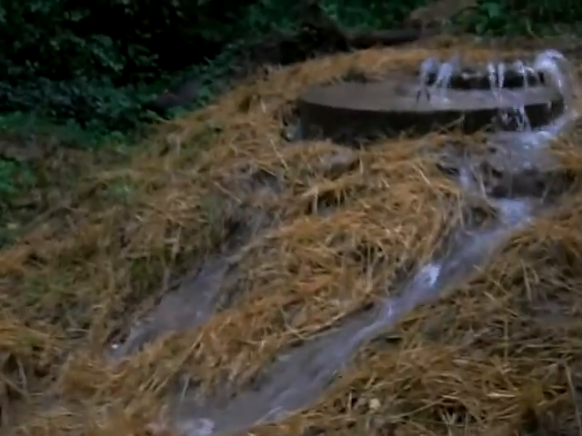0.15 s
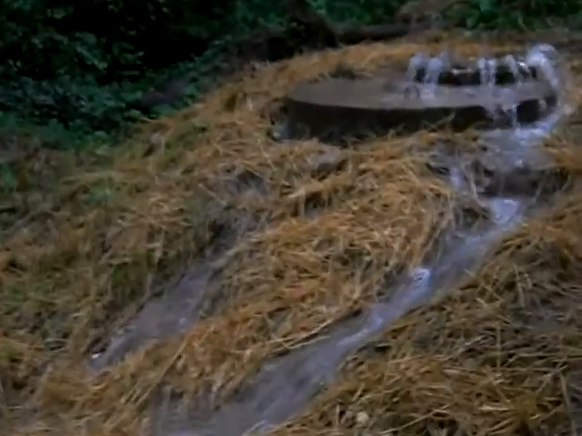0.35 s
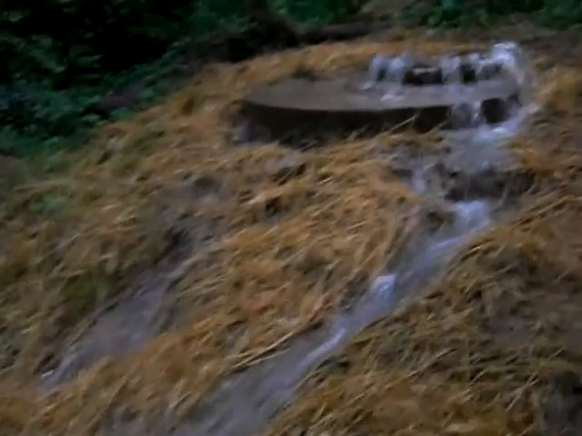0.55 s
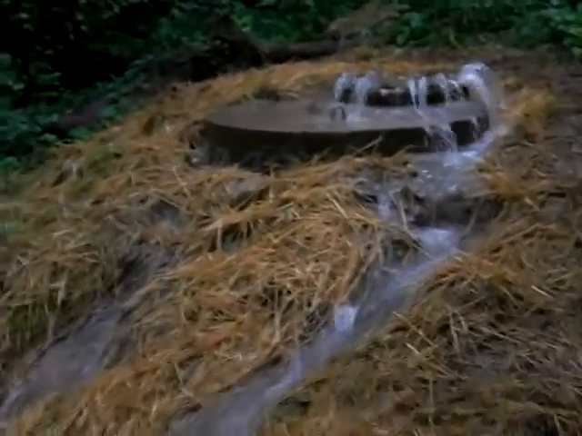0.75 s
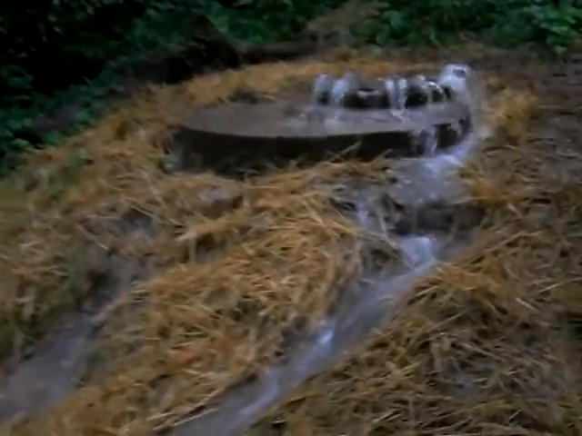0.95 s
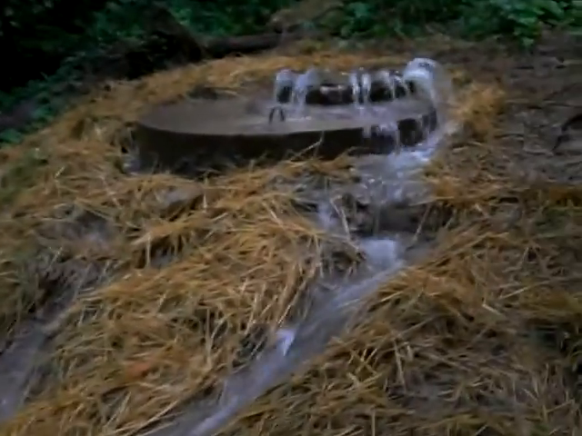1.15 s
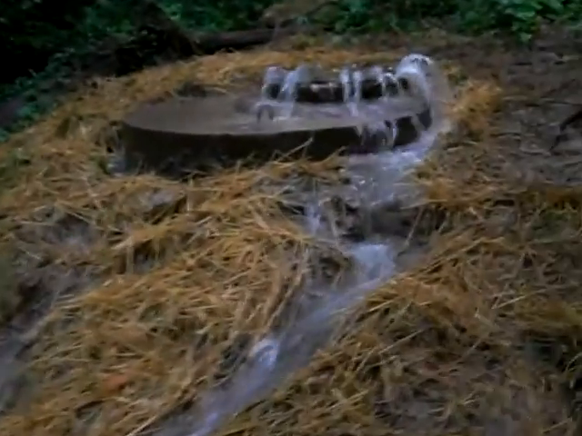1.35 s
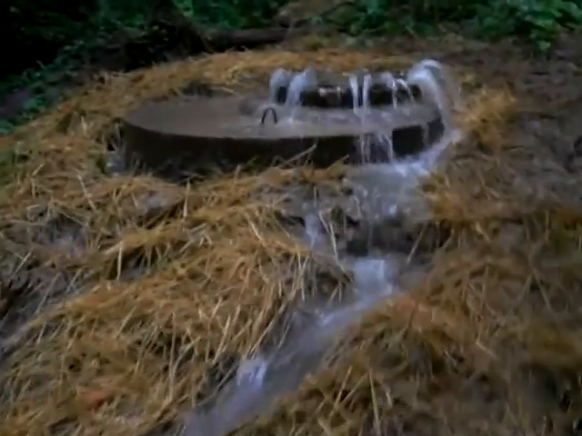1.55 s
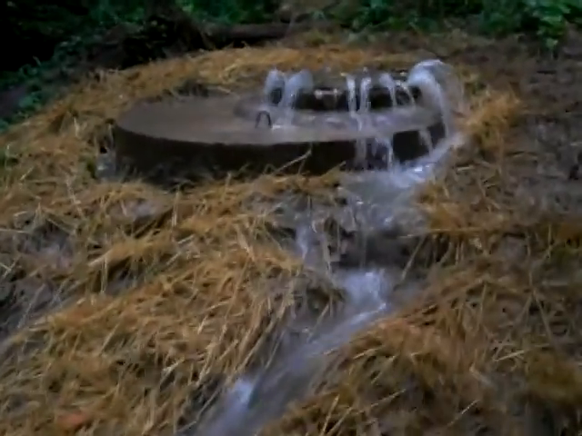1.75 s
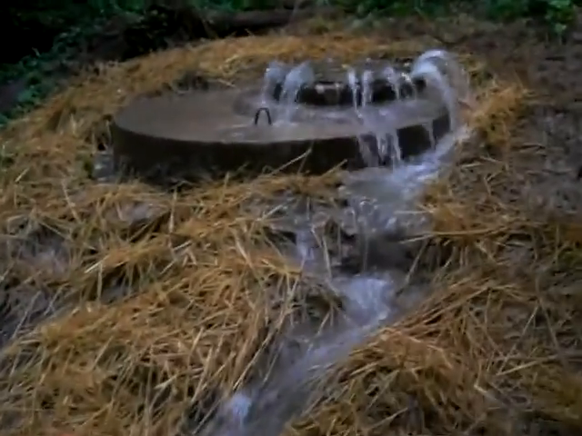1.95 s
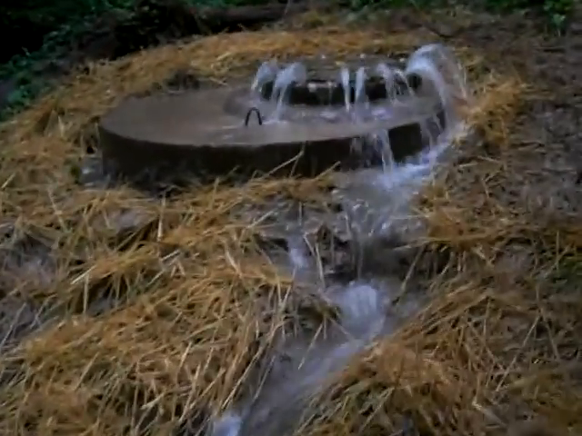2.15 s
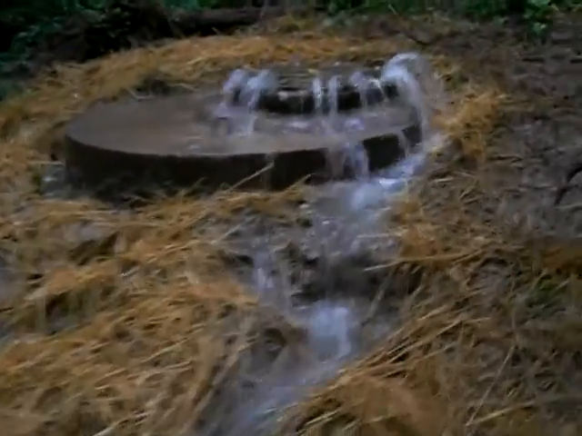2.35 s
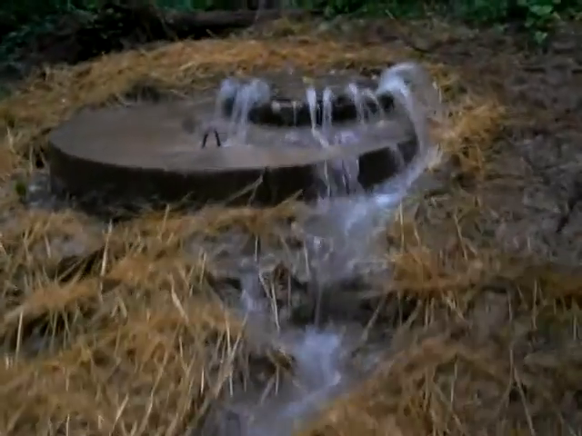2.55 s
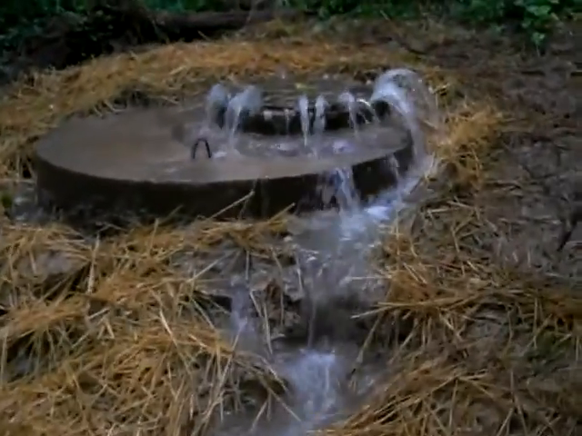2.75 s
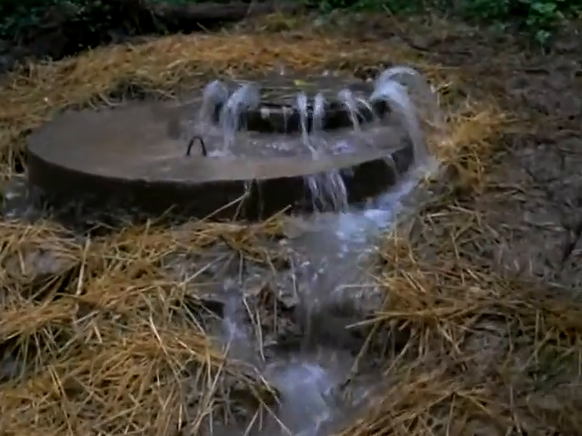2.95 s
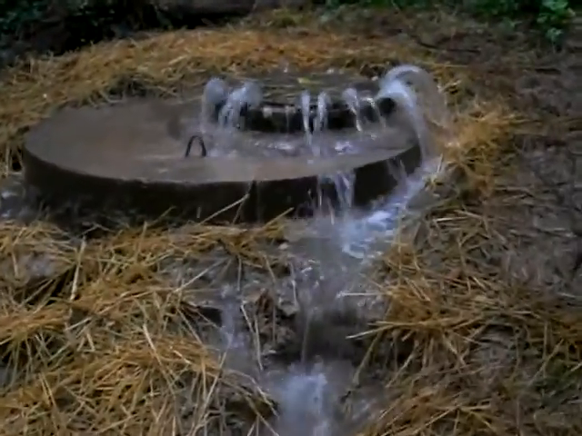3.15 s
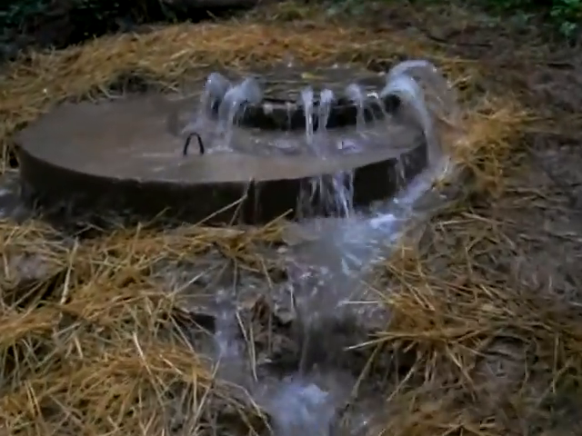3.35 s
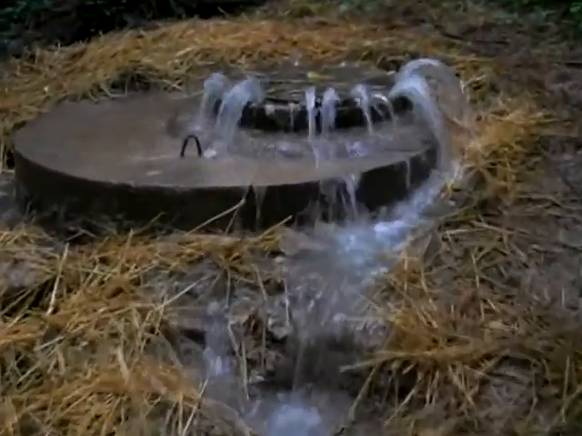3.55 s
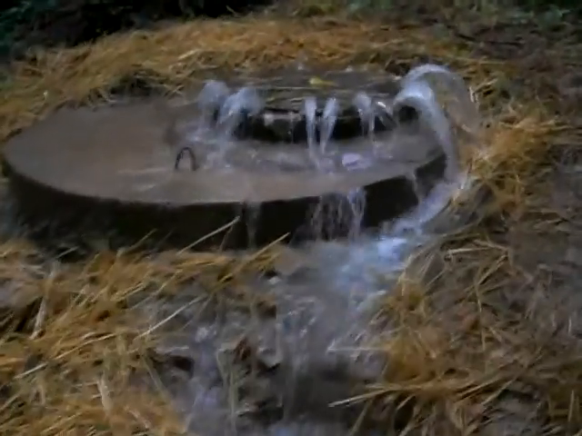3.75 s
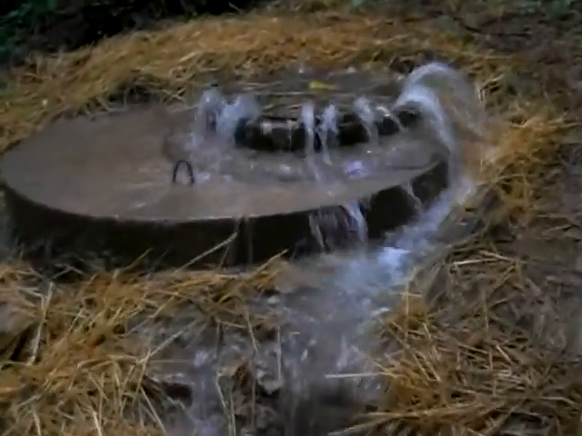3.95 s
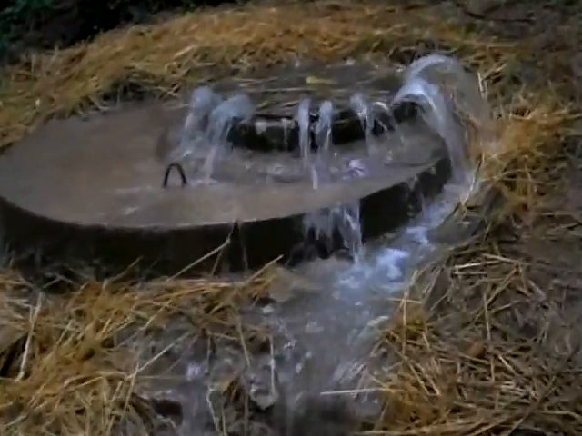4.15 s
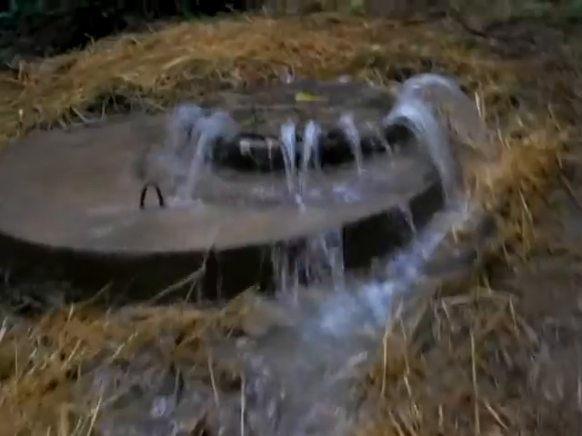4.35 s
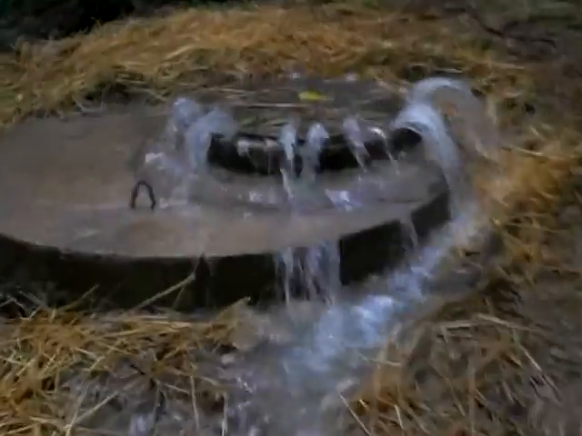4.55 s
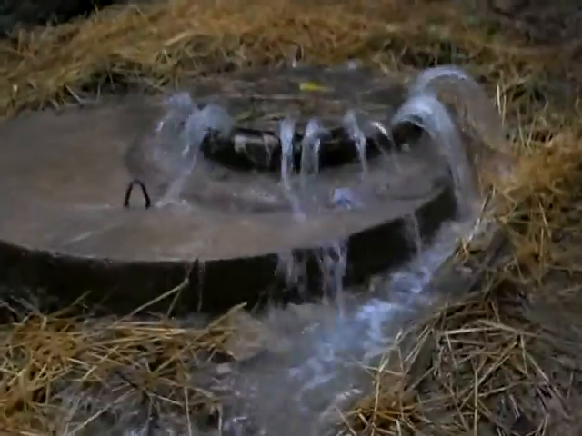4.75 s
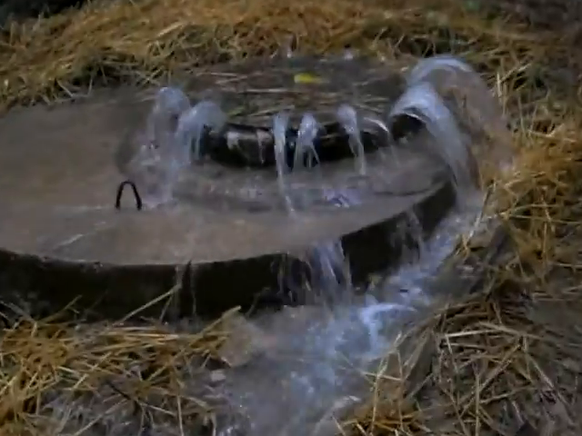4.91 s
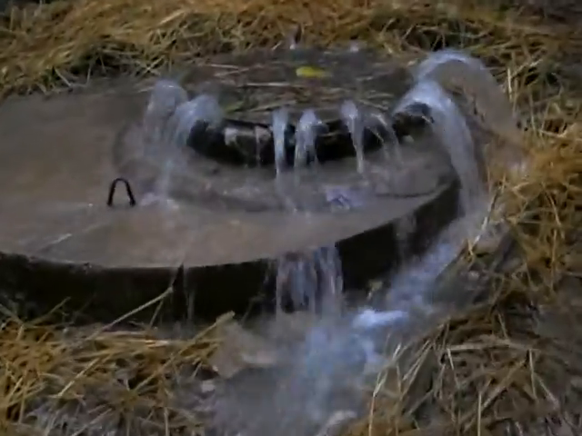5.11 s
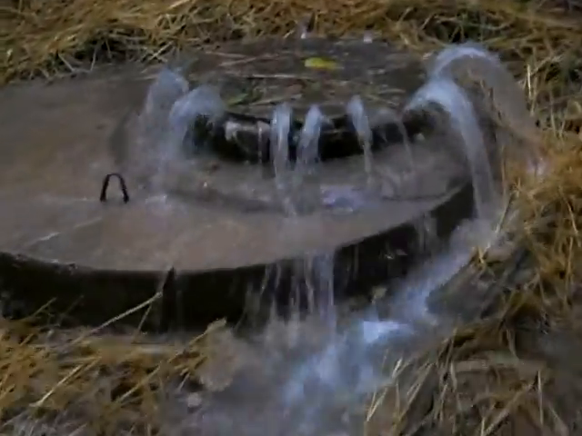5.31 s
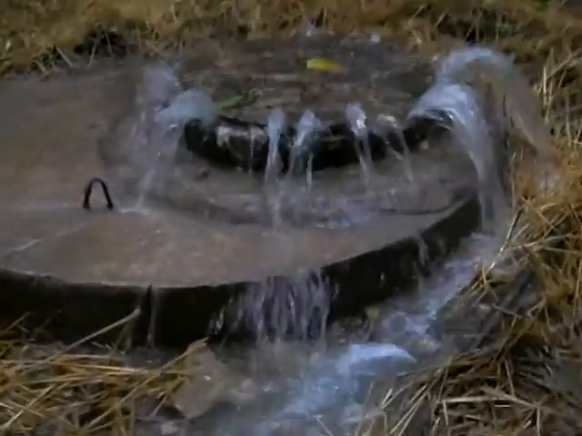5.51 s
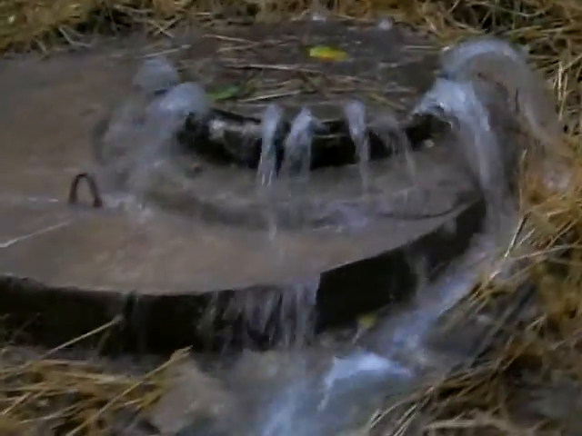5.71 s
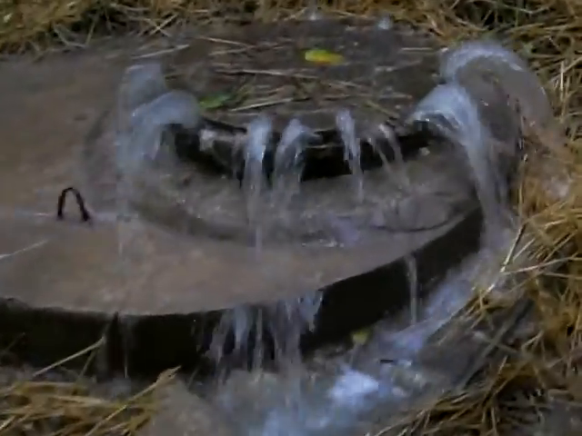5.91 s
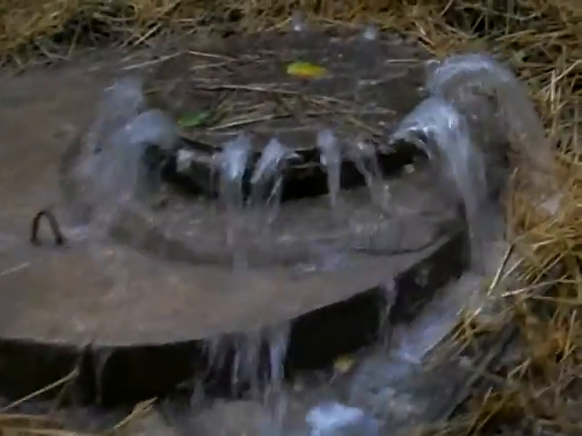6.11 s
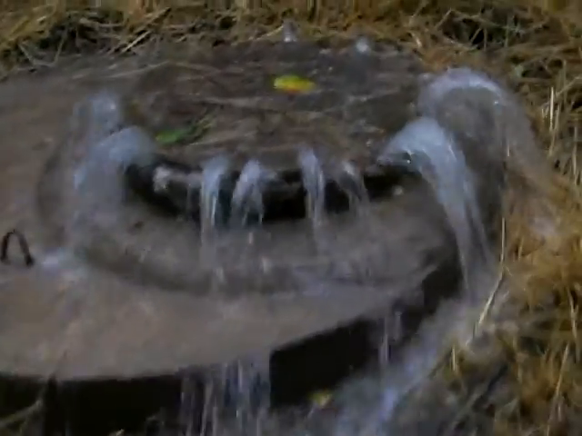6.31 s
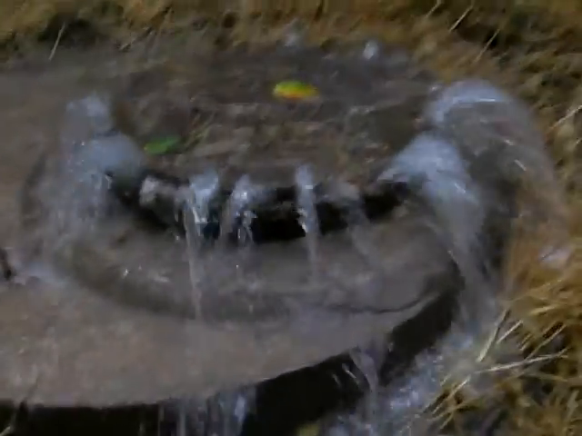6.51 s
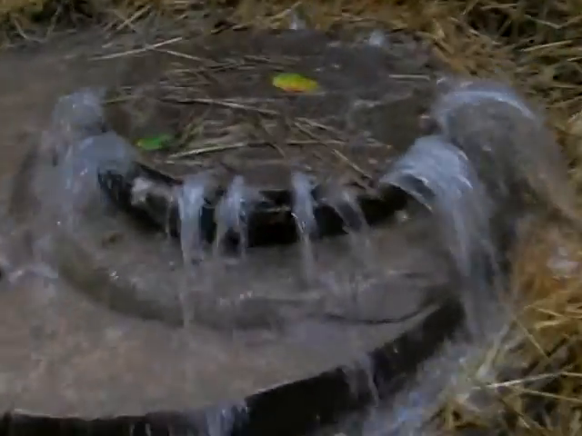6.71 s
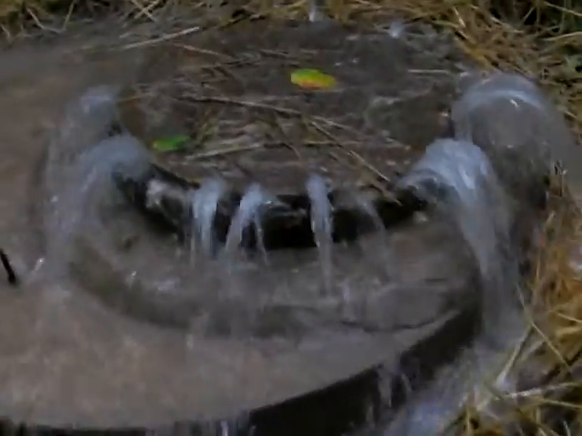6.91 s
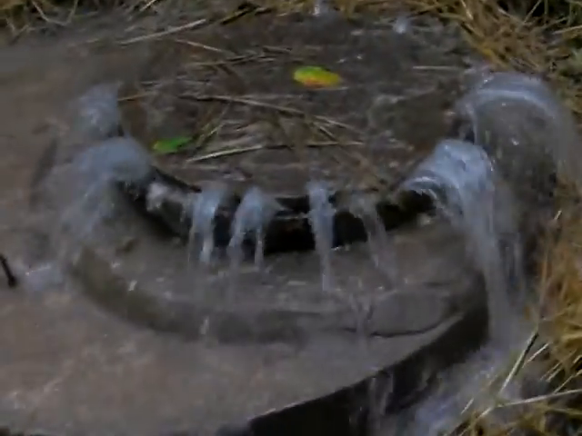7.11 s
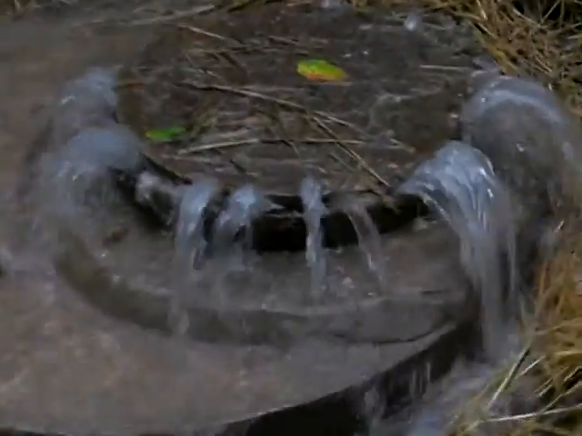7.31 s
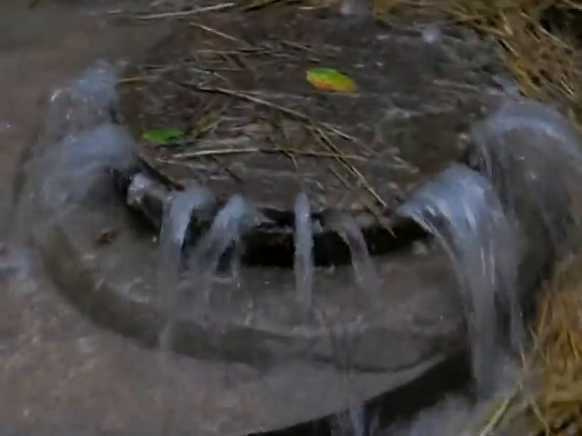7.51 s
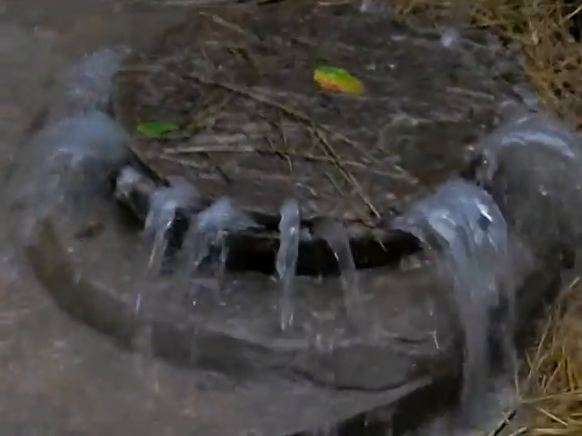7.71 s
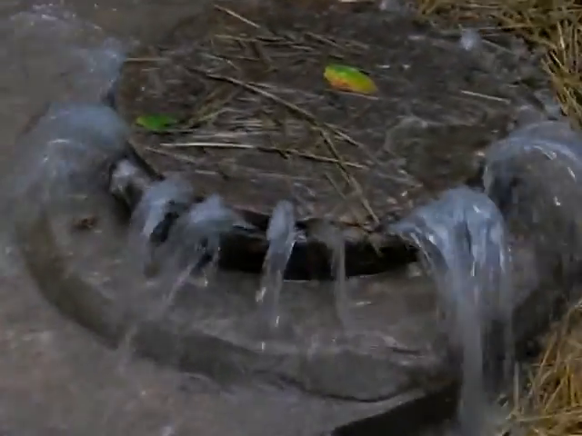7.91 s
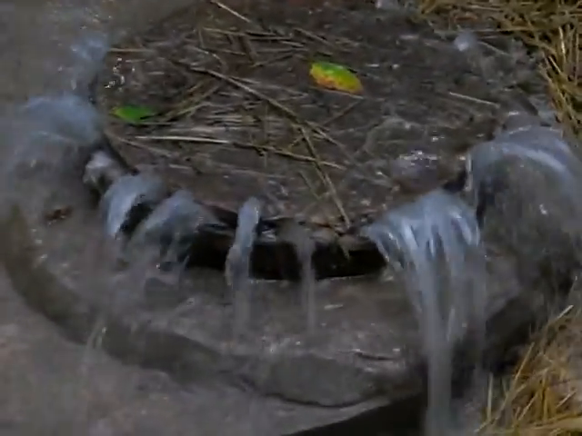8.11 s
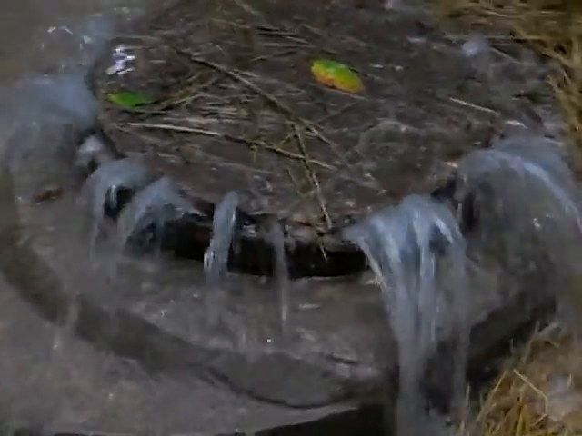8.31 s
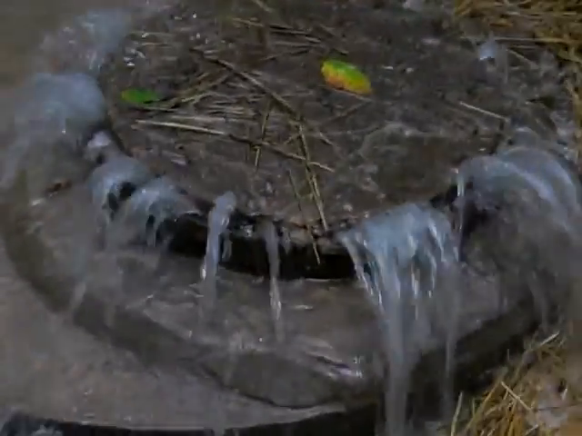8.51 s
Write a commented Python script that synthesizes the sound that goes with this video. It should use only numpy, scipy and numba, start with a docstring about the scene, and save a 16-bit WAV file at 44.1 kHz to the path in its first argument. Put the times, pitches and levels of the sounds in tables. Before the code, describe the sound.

Water spouts from under a manhole cover outdoors, splashing on concrete and running down a slope without a break for nearly nine seconds. It is a dense patter of drops with fizzing, tinkling bubbles and a fine hiss of spray. At first it sounds about four metres away, softer and a little duller. The microphone moves closer throughout, and the water gains roughly ten decibels, brightening from about 2 to 7.5 seconds and ending about a metre away. Fat drops smack irregularly, sharpest in a cluster between 5.5 and 6.1 seconds and again near 7.5 and 7.9. Small hollow glugs of air come from the rim from about 1.5 seconds, strongest between 6.4 and 8 seconds. Underneath lie a soft outdoor rumble and a faint, wavering low drone that swells slightly around 7 and 8 seconds.

```python
"""Overflowing manhole

Water spouts from under the rim of a manhole cover, splashes on its concrete collar and runs down a
straw-covered slope. Drops smack, bubbles ring and a fine spray hisses; air pockets glug out at the rim.
The microphone is carried slowly closer, so the water grows louder and brighter.
A faint low drone and an outdoor rumble lie beneath."""
import sys
import numpy as np
from scipy import signal
from scipy.fft import rfft, irfft, next_fast_len
from scipy.io import wavfile
from scipy.ndimage import uniform_filter1d
from numba import njit

SR = 44100
rng = np.random.default_rng(int(sys.argv[2]) if len(sys.argv) > 2 else 0)


def inscribe(sig):
    """Save sig as 16-bit PCM at rate SR to the path in sys.argv[1].

    A 1-D sig is mono; a 2-D sig holds one channel per row.
    Samples are clipped to [-1, 1] before scaling.
    """
    pcm = np.round(np.clip(np.atleast_2d(sig).T, -1, 1) * 32767)
    wavfile.write(sys.argv[1], SR, pcm.astype(np.int16))


N = 382347
TIME = np.arange(N) / SR
CUTOFF_HZ = 15800
SPLASH_FALL_DB = 5   # per doubling of the distance


def from_db(db):
    """Decibels to gain."""
    return 10 ** (np.asarray(db) / 20)


def rms_one(x):
    """Scale to rms 1."""
    return x / np.sqrt(np.mean(x ** 2) + 1e-20)


def drift(rate):
    """A smooth random wobble that moves about rate times a second; rms 1."""
    pole = np.exp(-40 * np.pi * rate / SR)
    noise = rng.standard_normal(N // 20 + 4002)
    slow = signal.lfilter([1], [1, -2 * pole, pole * pole], noise)[4000:]
    return np.interp(np.arange(N) / 20, np.arange(len(slow)), rms_one(slow))


def shaped(x, gain_at):
    """Filter by a smooth gain given as a function of frequency."""
    size = next_fast_len(N + SR // 2)
    hz = np.maximum(np.fft.rfftfreq(size, 1 / SR), 1)
    return irfft(rfft(x, size) * gain_at(hz), size)[:N]


def coloured(x, eq):
    """Play a sound through an EQ curve; rms 1."""
    points_hz, points_db = np.transpose(eq)
    return rms_one(shaped(x, lambda hz: from_db(np.interp(np.log(hz), np.log(points_hz), points_db))))


@njit
def rings(start, height, hz, cycles, rise, onset, choke):
    """Sine pings that swell over onset cycles, fall 60 dB in their cycles and bend up by the share rise.
    With choke 0 they die evenly; with choke 1 they hold at first and then collapse."""
    out = np.zeros(N)
    for k in range(len(start)):
        length = cycles[k] / hz[k] * SR
        step = 2 * np.pi * hz[k] / SR
        phase, level, muted = 0., height[k], 1.
        swell = np.exp(-hz[k] / SR / onset)
        fade = np.exp(-np.log(1000) * (1 - choke) / length)
        hasten = np.exp(-2 * np.log(1000) * choke / length ** 2)
        for i in range(min(int(length), N - start[k])):
            out[start[k] + i] += level * (1 - muted) * np.sin(phase)
            phase += step * (1 + rise * i / length)
            level *= fade
            fade *= hasten
            muted *= swell
    return out


# The walk up to the cover, slowing as it arrives. Each row: time in seconds, distance in metres.
APPROACH = [(0, 4.03), (2.6, 2.32), (6.1, 1.305), (8.67, 1.05)]


def level_at(s, near_db, fall_db):
    """Level at times s along the walk: near_db at 1 m, less fall_db for each doubling of the distance."""
    return near_db - fall_db * np.log2(np.interp(s, *np.transpose(APPROACH)))


def approached(x, near_db, fall_db):
    """Ride the fader on a steady flow so that distance alone sets its slow level."""
    slow_rms = np.sqrt(uniform_filter1d(x ** 2, size=30000))
    return x / slow_rms * from_db(level_at(TIME, near_db, fall_db))


def surging(lump_db, flutter_db):
    """A jet breaks into lumps, so its flow is uneven, while the supply behind it stays steady."""
    flow = from_db(lump_db * drift(26) + flutter_db * drift(110))
    return flow / uniform_filter1d(flow, size=SR // 5)


def births(per_s, surge, spread_db, limit):
    """Random triggers, crowded where the water surges, with log-normal sizes of either sign."""
    start = np.flatnonzero(rng.random(N) < per_s * surge / SR)
    sizes = from_db(spread_db * np.minimum(rng.standard_normal(len(start)), limit))
    return start, sizes * rng.choice(np.array([-1, 1]), len(start))


def patter(surge, per_s, spread_db, scatter_s, scatter_db):
    """Drops hit as broad clicks, each followed by a short puff of droplets."""
    start, sizes = births(per_s, surge, spread_db, limit=4.1)
    clicks = np.zeros(N)
    clicks[start] = sizes
    puff_power = signal.lfilter([1], [1, -np.exp(-1 / (scatter_s * SR))], clicks ** 2 + 1e-18)
    droplets = rms_one(np.sqrt(puff_power) * rng.standard_normal(N))
    return rms_one(rms_one(clicks) + from_db(scatter_db) * droplets)


def bubbles(surge, per_s, low_hz, high_hz, cycles, spread_db, rise):
    """Trapped bubbles of many sizes, each ringing briefly and climbing in pitch as it surfaces."""
    start, sizes = births(per_s, surge, spread_db, limit=3.04)
    hz = low_hz * (high_hz / low_hz) ** rng.random(len(start))
    life = cycles * from_db(4.2 * rng.standard_normal(len(start)))
    height = sizes * hz   # keeps the band flat overall
    return rms_one(rings(start, height, hz, life, rise, onset=.7, choke=.9))


# The tone of the splash from down the slope, from halfway and from beside the cover.
# Each row: frequency in Hz, relative gain in dB.
FAR_EQ = [(110, -44), (180, -20), (287, -5.5), (388, -6), (477, -5), (586, -3.5), (775, -6), (971, -2.5),
          (1580, -3), (1900, -1), (3040, -3.5), (4770, -4), (9350, -8.5), (13100, -13.5), (15800, -23)]
HALFWAY_EQ = [(110, -47), (180, -20), (230, -11.5), (340, -10), (410, -6), (504, -4.5), (693, -4.5),
              (1390, -2), (1700, -3), (2340, -1.5), (2670, -3), (4950, -0.5), (10300, -5), (14900, -16),
              (15800, -19)]
NEAR_EQ = [(110, -37), (180, -11), (262, -7), (367, -9), (495, -6.5), (631, -3.5), (761, -5.5), (971, -5),
           (1260, -3.5), (2300, -0.5), (3040, -0.5), (3810, 2), (11300, -4.5), (14100, -12.5), (15800, -16)]


def splashing():
    """Jets patter and spray on the concrete, while the pool and the runnel below fizz and tinkle."""
    jets = surging(lump_db=.95, flutter_db=1.65)
    pool = surging(lump_db=1.3, flutter_db=1.6)
    drops = patter(jets, per_s=2600, spread_db=6.0, scatter_s=0.0021, scatter_db=2.0)
    spray = rms_one(np.sqrt(jets) * rng.standard_normal(N))
    fizz = bubbles(pool, per_s=8500, low_hz=169.2, high_hz=15250, cycles=7.4, spread_db=6.0, rise=0.12)
    tinkle = bubbles(pool, per_s=1100, low_hz=422.6, high_hz=12950, cycles=21, spread_db=4.5, rise=0.089)
    plinks = bubbles(pool, per_s=110, low_hz=862, high_hz=2683, cycles=24, spread_db=5.5, rise=0.092)
    sparkle = bubbles(jets, per_s=260, low_hz=2998, high_hz=14010, cycles=67, spread_db=3.0, rise=0.065)
    gurgle = bubbles(pool, per_s=30, low_hz=430, high_hz=719, cycles=11, spread_db=4.5, rise=0.12)
    ringing = (from_db(-3.5) * fizz + from_db(-10.5) * tinkle + from_db(-18.5) * plinks
               + from_db(-12) * sparkle + from_db(-21.5) * gurgle)
    hiss = from_db(-4) * drops + from_db(-3) * spray
    # small drops move little water, so the low end belongs to the bubbles
    white = ringing + signal.sosfilt(signal.butter(2, 550, "high", fs=SR, output="sos"), hiss)
    # crossfade the EQ from far to near
    place = np.interp(TIME, [1.7, 4.5, 7.4], np.arange(3))
    water = sum(np.maximum(1 - abs(place - k), 0) * coloured(white, eq)
                for k, eq in enumerate([FAR_EQ, HALFWAY_EQ, NEAR_EQ]))
    # the fine spray on top gains more from coming close than the body of the splash
    body = shaped(water, lambda hz: 1 / (1 + (hz / 3000) ** 12))
    top = water - body
    return approached(body, near_db=-28.5, fall_db=SPLASH_FALL_DB) + approached(top, near_db=-25, fall_db=6)


# The drone's slow swells, before its random waver. Each row: time in seconds, rms level in dB.
DRONE_SWELLS = [(0.55, -55), (1.0, -67), (1.85, -67), (2.3, -54), (3.9, -68), (6.4, -61), (7.0, -52.5),
                (7.5, -59), (8.1, -50), (8.67, -61)]
# The tone of the outdoor rumble. Each row: frequency in Hz, relative gain in dB.
RUMBLE_EQ = [(12, -14), (22, -4), (34, -7), (65, -2.5), (130, -7), (200, -8.5), (400, -14.5), (1200, -56)]
# Soft low resonances around the drone. Each row: centre in Hz, half-width in Hz, rms level in dB.
DRONE_RESONANCES = [(75.4, 8.4, -62), (101, 7.9, -63), (119.5, 4.9, -70.5), (155.3, 9.5, -66.5)]


def drone_and_rumble(drone_hz, waver_hz, rumble_db):
    """The low bed: a wavering sine and narrow bands of noise over a soft outdoor rumble."""
    phase = 2 * np.pi * np.cumsum(drone_hz + waver_hz * drift(4.3)) / SR
    level_db = np.interp(TIME, *np.transpose(DRONE_SWELLS)) + 2.5 * drift(3)
    bed = from_db(level_db) * rms_one(np.sin(phase))
    bed += from_db(rumble_db) * coloured(rng.standard_normal(N), RUMBLE_EQ)
    for centre, width, band_db in DRONE_RESONANCES:
        band = shaped(rng.standard_normal(N), lambda hz: 1 / (1 + ((hz - centre) / width) ** 2))
        bed += from_db(band_db) * rms_one(band)
    return bed


def strays(per_s, near_db, spread_db, low_hz, high_hz):
    """Random lesser hits, louder from close by. Each row: start in seconds, level in dB, pitch in Hz."""
    wait, size, pitch = rng.random((200, 3)).T
    s = np.cumsum(-np.log(1 - wait)) / per_s
    hit_db = level_at(s, near_db, SPLASH_FALL_DB) + spread_db * (2 * size - 1)
    hz = low_hz * (high_hz / low_hz) ** pitch
    return np.column_stack([s, hit_db, hz])[s < TIME[-1]]


def puffs(start, height, fade_s, low_hz, high_hz):
    """Short bursts of band-passed noise that die away after each start."""
    hits = np.zeros(N)
    hits[start] = height
    envelope = signal.lfilter([1], [1, -np.exp(-1 / (fade_s * SR))], hits + 1e-18)
    band = signal.butter(1, [low_hz, high_hz], "band", fs=SR, output="sos")
    return signal.sosfilt(band, envelope * rng.standard_normal(N))


# The fattest drops smacking on wet concrete and into the pool.
# Each row: start in seconds, level in dB, pitch in Hz.
FAT_DROPS = [(0.072, -21.5, 1250), (0.2855, -21.5, 2380), (0.4156, -21.5, 1700), (1.7285, -19, 2270),
             (2.093, -13, 4590), (2.3533, -18, 2450), (2.8827, -16.5, 2620), (3.119, -10, 6200),
             (3.7527, -12, 7980), (4.6371, -8, 6080), (5.5353, -5, 6400), (5.7347, -1.5, 5400),
             (5.8648, -8, 6500), (6.006, -13, 3900), (6.0906, -11.5, 2660), (6.112, -10, 6400),
             (6.6152, -10, 2130), (7.543, -7, 3580), (7.8755, -8, 3870)]


def smacks(crack_cycles, ring_cycles, ring_db, scatter_db):
    """A fat drop cracks for a few cycles, throws a puff of droplets and leaves a small bubble ringing."""
    lesser = strays(per_s=2.6, near_db=-15, spread_db=2.5, low_hz=1800, high_hz=5200)
    s, hit_db, hz = np.vstack([FAT_DROPS, lesser]).T
    start, each = (s * SR).astype(np.int64), np.ones(len(s))
    crack = rings(start, from_db(hit_db), hz, crack_cycles * each, rise=-.1, onset=.6, choke=1.)
    ring = rings(start, from_db(hit_db + ring_db), hz, ring_cycles * each, rise=.06, onset=4.8, choke=.37)
    # the hardest, highest cracks scatter most
    scatter = from_db(hit_db + scatter_db) * np.minimum(hz / 6000, 1)
    return crack + ring + puffs(start, scatter, fade_s=.001, low_hz=2600, high_hz=14000)


# The biggest air pockets bursting at the rim. Each row: start in seconds, base level in dB, pitch in Hz.
AIR_POCKETS = [(1.53, -36, 549), (2.042, -34, 584), (2.618, -34, 473), (2.995, -29.5, 960),
               (3.447, -33, 410), (3.817, -33, 445), (4.416, -32, 450), (5.296, -31, 490),
               (5.354, -40, 288), (5.655, -31.5, 426), (6.044, -31.5, 418), (6.187, -39, 240),
               (6.396, -28, 480), (6.903, -37.5, 290), (6.929, -27, 856), (7.253, -23, 603),
               (7.856, -25.5, 545), (8.033, -27, 487)]


def glugs(cycles, throb_db, tail_cycles, tail_db):
    """Air pockets throb for a few cycles in the gap, burst with a slosh and leave a bubble ringing."""
    lesser = strays(per_s=1.1, near_db=-32.5, spread_db=2.5, low_hz=437, high_hz=696)
    s, hit_db, hz = np.vstack([AIR_POCKETS, lesser]).T
    start, each = (s * SR).astype(np.int64), np.ones(len(s))
    height = from_db(hit_db)
    throb = rings(start, height * from_db(throb_db), hz, cycles * each, rise=.04, onset=1.84, choke=1.)
    tail = rings(start, height * from_db(tail_db), hz, tail_cycles * each,
                 rise=.097, onset=2.5, choke=.36)
    slosh = puffs(start, height, fade_s=.02, low_hz=397, high_hz=750)
    return throb + tail + slosh


def scene():
    """The open-air mix, in mono."""
    air = glugs(cycles=9.1, throb_db=7, tail_cycles=42, tail_db=-7)
    drops = smacks(crack_cycles=7.9, ring_cycles=71, ring_db=-12.5, scatter_db=-10)
    water = splashing()
    bed = drone_and_rumble(drone_hz=76.6, waver_hz=.95, rumble_db=-52)
    return (water + bed + drops + air)[None]


def record(dry):
    """The recorder has one narrow notch in the treble and a steep top cut."""
    notched = signal.lfilter(*signal.iirnotch(7634, Q=75, fs=SR), dry)
    top_cut = signal.ellip(12, .1, 80, CUTOFF_HZ, fs=SR, output="sos")
    return signal.sosfilt(top_cut, notched)


dry = scene()
out = record(dry)
inscribe(out)
```